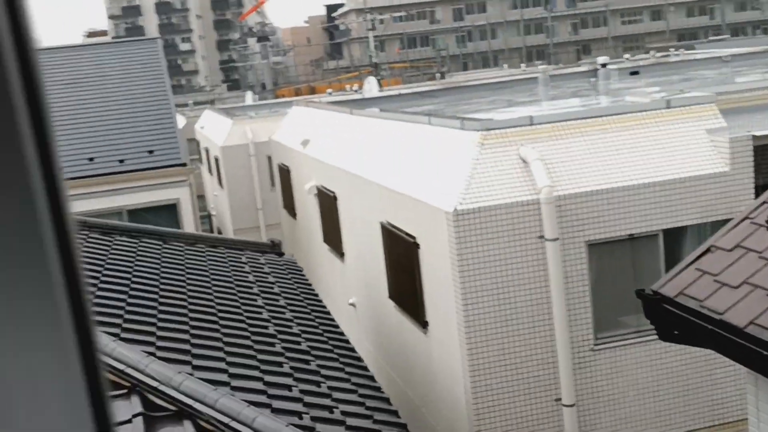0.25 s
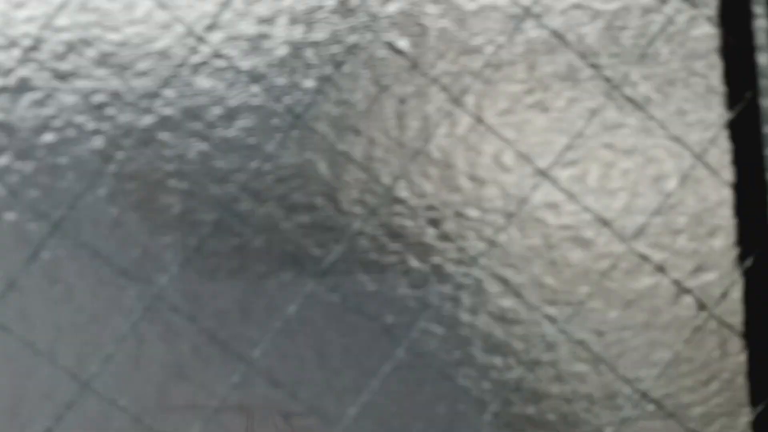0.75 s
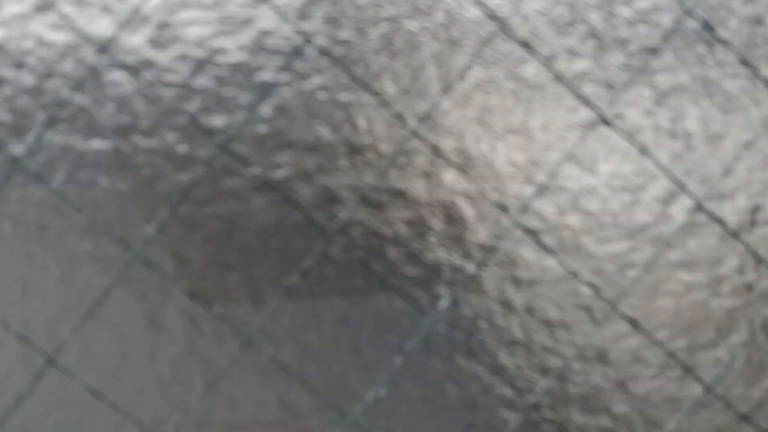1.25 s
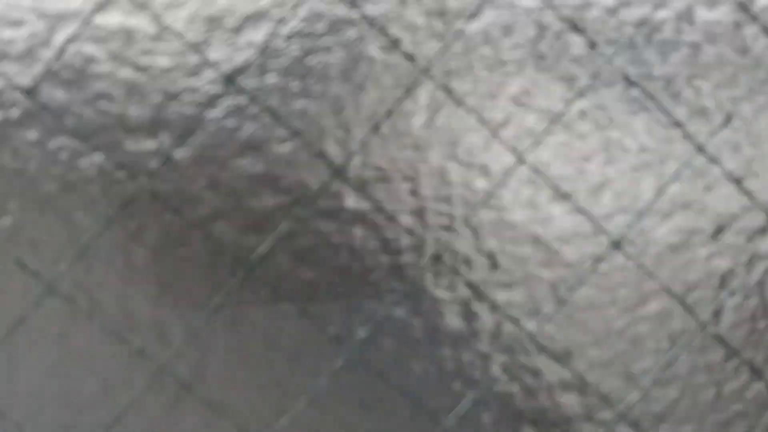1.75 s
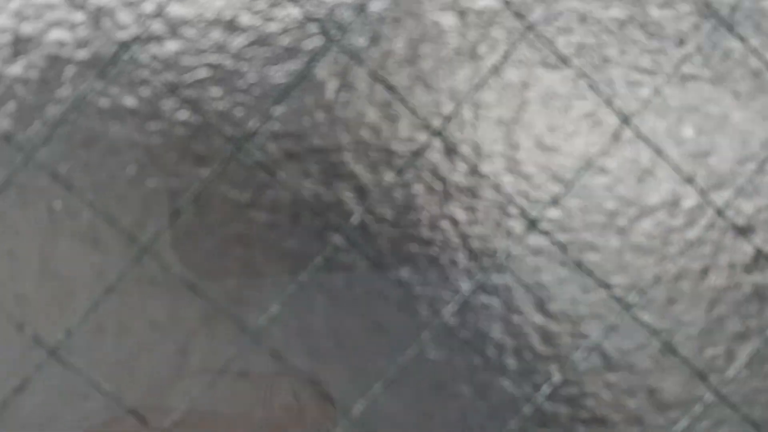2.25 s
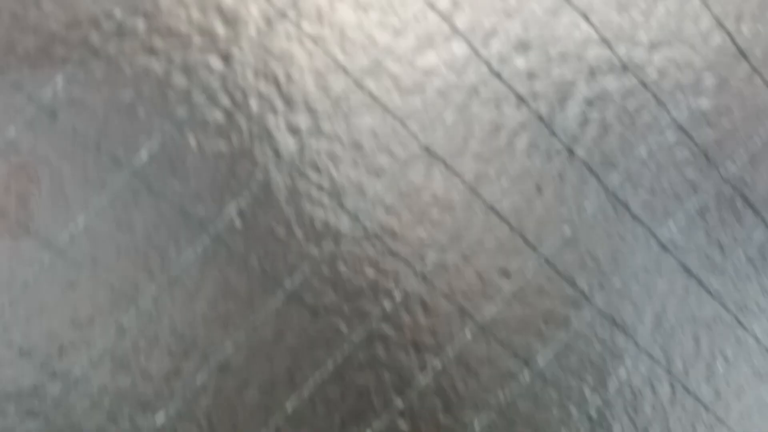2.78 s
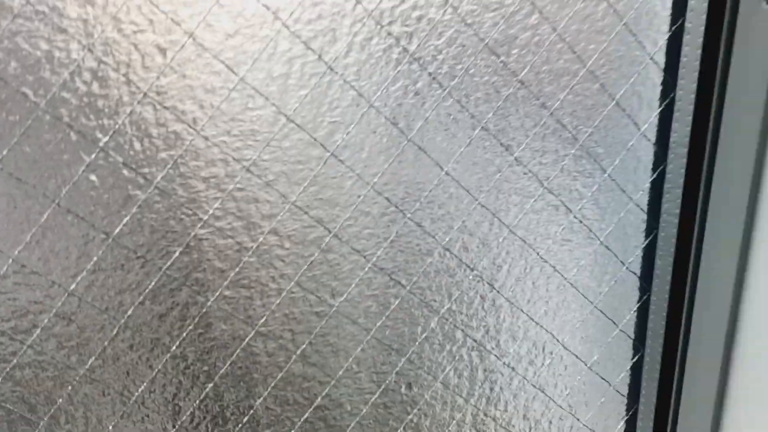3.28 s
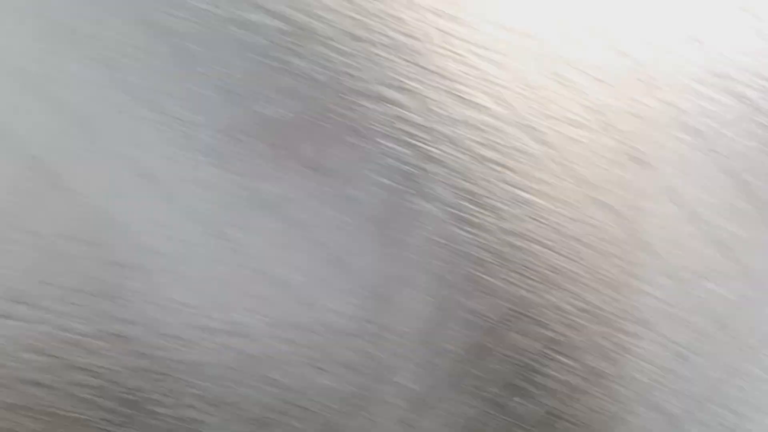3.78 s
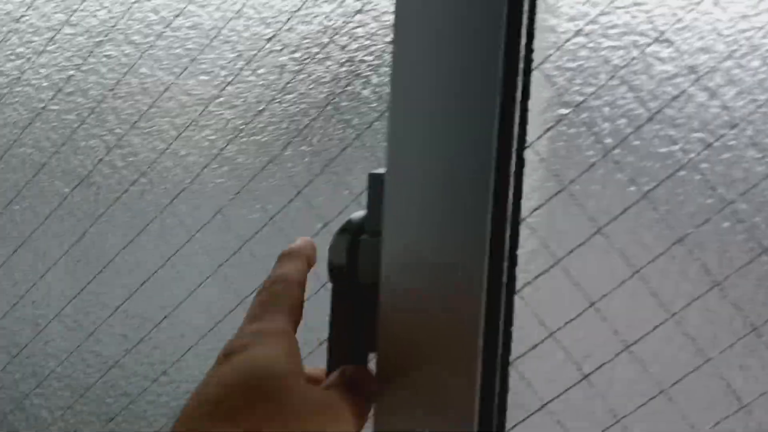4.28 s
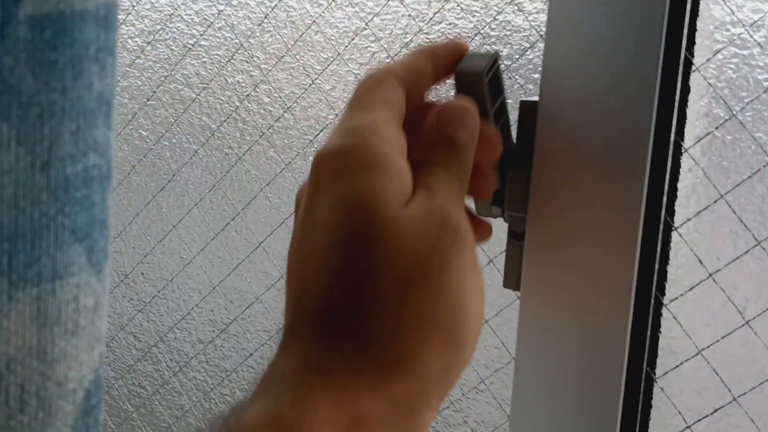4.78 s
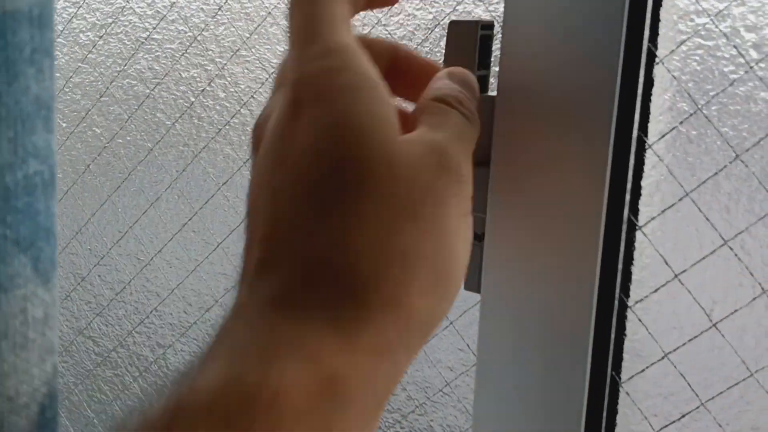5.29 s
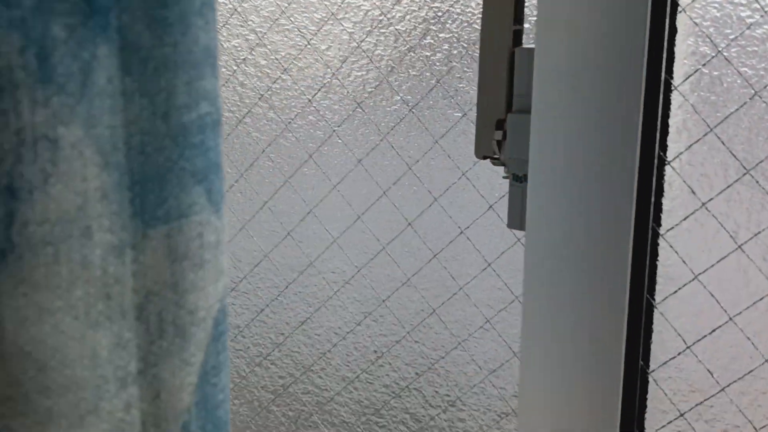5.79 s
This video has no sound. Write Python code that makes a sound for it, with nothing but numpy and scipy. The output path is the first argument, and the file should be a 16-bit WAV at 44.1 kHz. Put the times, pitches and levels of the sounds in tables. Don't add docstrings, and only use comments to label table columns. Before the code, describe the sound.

Inside a small furnished room, light rain washes in through an open window. The sash slides shut with a low rolling rumble, gritty scrape and brushing hiss, then slams hard and rattles. The rain becomes muffled. Catches tick, a hand and sleeve rustle, and a latch grinds and clicks before a faint creak. Close handheld stereo microphone.

```python
import sys
import numpy as np
from scipy import signal
from scipy.fft import rfft, irfft, next_fast_len
from scipy.io import wavfile
from scipy.ndimage import uniform_filter1d

SR = 44100
rng = np.random.default_rng(int(sys.argv[2]) if len(sys.argv) > 2 else 0)


def output_pcm(signal):
    pcm = np.clip(np.atleast_2d(signal).T, -1, 1) * 32767
    wavfile.write(sys.argv[1], SR, np.round(pcm).astype(np.int16))


N = 266275
LONG = next_fast_len(N)
BINS_HZ = np.arange(LONG // 2 + 1) * SR / LONG + 1

# frequency in Hz, width in Hz, level in dB.
FRAME_MODES = [(890, 204, -3), (1041, 110, -1), (1299, 105, 1.5), (1503, 154, 1.5), (1943, 200, -2.5),
               (2380, 376, -0.5), (2754, 270, -5.5)]
# frequency in Hz, level in dB per Hz.
SEAL_COLOUR = [(180, -9), (300, 3), (366, -21), (478, -14.5), (787, -22.5), (1040, -1), (1510, 1),
               (1750, -1), (2880, -7.5), (3830, -16), (8220, -17.5), (9880, -10), (16000, -37.5)]


def undb(db):
    return 10 ** (np.asarray(db) / 20)


def unit(x):
    return x / np.sqrt(np.mean(x ** 2))


def power_sum(*gains):
    return np.sqrt(sum(g ** 2 for g in gains))


def on_log(table, hz):
    f, v = np.transpose(table)
    return np.interp(np.log(hz), np.log(f), v)


def colour(x, table):
    n = next_fast_len(x.shape[-1])
    gain = undb(on_log(table, np.arange(n // 2 + 1) * SR / n + 1))
    return irfft(rfft(x, n) * gain, n)[..., :x.shape[-1]]


def shape(x, gain):
    return irfft(rfft(x, LONG) * gain, LONG)[..., :N]


def passband(x, lo_hz, hi_hz):
    return signal.sosfilt(signal.butter(3, [lo_hz, hi_hz], "band", fs=SR, output="sos"), x)


def resonate(x, hz, width_hz):
    return signal.lfilter(*signal.iirpeak(hz, hz / width_hz, fs=SR), x)


def glide(x, hz, width_hz):
    turn = np.exp(2j * np.pi * np.cumsum(hz * np.ones(x.shape[-1])) / SR)
    smooth = signal.lfilter(*signal.butter(2, width_hz / 2, fs=SR), x * turn.conj())
    return (smooth * turn).real / np.sqrt(width_hz)


def ring(x, hz, t60):
    p = np.exp(2j * np.pi * hz / SR - np.log(1000) / (t60 * SR))
    return signal.lfilter([0, p.imag], [1, -2 * p.real, abs(p) ** 2], x)


def walk(rate):
    k = int(SR / rate)
    steps = np.repeat(rng.standard_normal(N // k + 1), k)
    return uniform_filter1d(uniform_filter1d(steps, k), k)[:N]


def swell(s, db, rise_s, fall_s):
    t = np.arange(N) / SR - s
    return undb(db) * np.exp(np.where(t < 0, t / max(rise_s, .002), -t / max(fall_s, .002)))


def curves(table):
    s, *columns = np.transpose(table)
    t = np.arange(N) / SR
    gate = uniform_filter1d(1. * ((t >= s[0]) & (t < s[-1])), 900)
    return [np.interp(t, s, c) for c in columns], gate


def diffuse(grain_db):
    # frequency in Hz, share of the sound common to both microphones.
    likeness = [(60, 0.95), (300, 0.75), (500, 0.42), (1000, 0.27), (2500, 0.049), (5000, 0.021)]
    grains = np.repeat(np.minimum(rng.exponential(size=N // 32 + 1), 5.), 32)[:N]
    common, left, right = rng.standard_normal((3, N)) * undb(grain_db * grains)
    share = np.clip(on_log(likeness, BINS_HZ), 0, 1)
    return shape(common, np.sqrt(share)) + shape(np.array([left, right]), np.sqrt(1 - share))


def rain():
    # frequency in Hz, level in dB per Hz.
    rain_colour = [(25, -34), (60, -4), (105, 3), (150, -8.5), (210, -6.5), (315, 0.5), (450, -14.5),
                   (750, -14.5), (1050, -10.5), (2000, -14.5), (4000, -32.5), (7500, -37.5), (9900, -27.5),
                   (15500, -33.5)]
    wash, gust, out = colour(diffuse(grain_db=0.8), rain_colour), walk(1.66), 0
    for hz in 30 * 2 ** np.arange(0, 9.3, .5):
        out = out + undb(0.56 * gust + 1.4 * walk(6.9)) * resonate(wash, hz, 0.48 * hz)
    half_shut_s, shutting_s, open_db = 0.79, 0.43, 6.5
    opening = 1 / (1 + np.exp((np.arange(N) / SR - half_shut_s) / shutting_s))
    return unit(out) * undb(-58.5 + open_db * opening)


def room(x):
    t60_s, top_t60_s, room_db = 0.24, 0.11, -8.5
    t = np.arange(int(.4 * SR)) / SR
    noise = rng.standard_normal((2, len(t)))
    low = signal.lfilter(*signal.butter(1, 2500., fs=SR), noise)
    tail = low * undb(-60 * t / t60_s) + (noise - low) * undb(-60 * t / top_t60_s)
    tail = signal.lfilter(*signal.butter(2, 300., "high", fs=SR), tail * (t > .003))
    return x + undb(room_db) * signal.fftconvolve(x[None], unit(tail) / np.sqrt(len(t)))[:, :N]


def pane(push, damp=1.):
    # frequency in Hz, level in dB, 60 dB decay in seconds.
    pane_modes = [(61, -11, 0.59), (102.8, -5, 0.75), (157.6, -6, 0.38), (187.2, -4, 0.33),
                  (218.3, 1, 0.25), (307.3, -14, 0.23), (382, -17, 0.11), (455.6, -18, 0.35),
                  (511, -17.5, .2)]
    out = 0
    for k, (f, db, t60) in enumerate(pane_modes):
        out = out + (-1) ** k * undb(db + 2.8 * walk(22.03)) * ring(push, f, t60 * damp)
    return out


def rumble():
    push = diffuse(grain_db=2.5)
    return unit(unit(pane(push)) * undb(-3.5) + unit(resonate(push, 152.0, 200.0)))


def hiss(flicker_db):
    high = signal.butter(3, 4400., "high", fs=SR, output="sos")
    top = signal.sosfilt(high, colour(diffuse(grain_db=1.7), SEAL_COLOUR))
    return unit(top) * undb(flicker_db * walk(24))


def rustle():
    # peak in seconds, level in dB, rise in seconds, fall in seconds,
    # brightness in dB.
    strokes = [(2.78, -62, .12, 0.17, -6), (3.24, -67, 0.14, 0.14, 4), (3.6, -53, 0.28, 0.15, -6.5),
               (3.73, -48.5, 0.074, 0.18, 2), (3.88, -58, 0.082, 0.05, 6), (4.05, -65, 0.036, 0.046, 7),
               (4.53, -61.5, 0.19, .12, 2), (5.38, -60, 0.18, 0.21, -32), (5.85, -65, .05, 0.092, 2)]
    # peak in seconds, level in dB, fall in seconds.
    shudder = [(1.998, -21, 0.034), (2.11, -47.5, .15), (2.22, -38.5, 0.063), (2.7, -51.5, 0.78),
               (2.86, -57, 0.083), (4.05, -52.5, 0.13), (4.71, -57, .2)]
    # peak in seconds, level in dB, rise in seconds, fall in seconds.
    brushes = [(2.8, -62, .2, 0.28), (3.3, -64, 0.13, 0.18), (3.75, -53, 0.14, 0.19),
               (4.53, -58, 0.19, .15), (4.87, -63, .03, .04), (5.83, -63.5, .1, 0.11)]
    # peak in seconds, level in dB, rise in seconds, fall in seconds.
    let_go = (5.37, -57, .07, .17)
    # frequency in Hz, level in dB.
    creak_modes = [(920, 2), (1060, 2), (1520, 3), (1790, 1), (2040, 1), (2290, -15), (2850, -5)]
    # frequency in Hz, level in dB.
    cloth_bands = [(500, -12), (800, -7), (1500, -2.5), (2400, -1), (3000, -7), (3700, -15.5),
                   (4600, -17.5)]
    still_db, still_bright_db, still_hiss_db, still_pane_db = -67, -73.5, -72, -62
    shut = np.arange(N) / SR > shudder[0][0]
    shake = power_sum(*(swell(s, db, 0.0098, fall_s) for s, db, fall_s in shudder))
    rattle = undb(-23) * shake
    dull = power_sum(*(swell(*row[:4]) for row in strokes))
    sharp = power_sum(*(swell(*row[:4]) * undb(row[4]) for row in strokes))
    dull_db = 20 * np.log10(power_sum(undb(still_db), dull, rattle))
    bright_db = 20 * np.log10(power_sum(undb(still_bright_db), sharp, rattle))

    cloth, rub = diffuse(grain_db=2.0), 0
    for hz in 560 * 2 ** np.arange(0, 3.1, 1 / 3):
        bright = np.clip(np.log2(hz / 1380.0) / .8, 0, 1)
        patch = unit(resonate(resonate(cloth, hz, 0.38 * hz), hz, 0.38 * hz))
        band_db = (1 - bright) * dull_db + bright * bright_db + on_log(cloth_bands, hz)
        rub = rub + undb(band_db + 3.5 * walk(25)) * patch

    focus_db = bright_db + 1.0 * (bright_db + 45.5) + 3.6 * walk(30)
    focus = unit(glide(cloth, 3300. * (1 + 0.032 * walk(10)), 550.)) * undb(focus_db)
    singing = sum(undb(db + 4. * walk(11)) * resonate(cloth, f, 60.) for f, db in creak_modes)
    creak = unit(singing) * swell(*let_go)
    fizz = power_sum(undb(still_hiss_db), *(swell(*row) for row in brushes))
    fizz = fizz * undb(-1.0) * hiss(flicker_db=-3.5)
    low = power_sum(undb(still_pane_db), shake, undb(-30.5) * dull ** 0.59)
    return shut * (rub + focus + creak + fizz + low * undb(-2.5) * rumble())


def latch():
    # time in seconds, level in dB.
    grind = [(4.46, -48), (4.474, -73), (4.508, -53), (4.53, -54.5), (4.74, -48.5), (4.812, -61),
             (4.834, -47), (4.95, -64)]
    # frequency in Hz, width in Hz, level in dB.
    keeper_modes = [(316, 25, 7.5), (491, 36, 1), (558, 22, 3), (630, 37, -2), (770, 44, -31)]
    (grind_db,), moving = curves(grind)
    slips = diffuse(grain_db=4.5)
    seats_s, seated_tilt_db = 4.67, 9.5
    seated = np.tanh((np.arange(N) / SR - seats_s) / 0.022)
    rings = 0
    for f, w, db in keeper_modes:
        tilted_db = db - seated_tilt_db * seated * np.log2(f / 424.0)
        rings = rings + undb(tilted_db) * resonate(slips, f, w) / np.sqrt(w)
    return moving * undb(grind_db + 0.6) * unit(rings)


def knocks(table, crack_colour, contact_s, pane_db, frame, low_hz, damp):
    size = 4096
    out, push, t = np.zeros(N + size), np.zeros(N + size), np.arange(size) / SR
    contact = np.hanning(int(contact_s * SR))
    for s, peak_db, hz, blow_db, crack_db, t60 in table:
        noise, i = rng.standard_normal((2, size)), int(s * SR)
        decay = undb(-60 * t / max(t60, .004)) + 0.89 * np.exp(-t / 0.00039)
        fade = (1 - np.exp(-t / 0.00012)) * decay
        burst = noise[0] * fade
        own = resonate(resonate(burst, hz, 0.51 * hz), hz, 0.51 * hz)
        sash = sum((-1) ** k * undb(db) * resonate(burst, f, 2.75 * w) for k, (f, w, db) in enumerate(FRAME_MODES))
        body = own + frame * passband(sash, 280.0, 3300.) + 0.044 * passband(burst, 310.0, 4014.0)
        crack = fade * colour(noise[1], crack_colour)
        out[i:i + size] += undb(peak_db + 1.5) * body / abs(body).max()
        out[i:i + size] += undb(crack_db + 2.0) * crack / abs(crack).max()
        push[i:i + len(contact)] += undb(blow_db + pane_db) * contact / contact.sum()
    return out[:N] + signal.lfilter(*signal.butter(2, low_hz, "high", fs=SR), pane(push[:N], damp))


def hard_knocks():
    # start in seconds, peak in dB, ring in Hz, blow on the pane in dB, crack in
    # dB.
    rail_ticks = [(0.11, -49, 1040, -42.5, -42), (0.171, -33, 1510, -47, -33),
                  (0.172, -37.5, 3700, -63, -45), (1.704, -31, 1040, -35, -56),
                  (1.892, -33.5, 1320, -47, -51), (1.964, -31, 1300, -55, -56),
                  (1.997, -17.5, 1310, -40.5, -35), (2.035, -33, 1390, -45, -50)]
    catch_ticks = [(2.593, -47, 2600, -51.5, -48), (2.628, -43, 2000, -36.5, -54),
                   (2.65, -26, 2250, -43.5, -9.5), (2.651, -30.5, 1300, -51, -40),
                   (2.675, -41.5, 1210, -34, -56), (2.815, -44, 1050, -65, -75),
                   (2.858, -38, 1710, -54, -76), (2.896, -39.5, 1000, -61, -67)]
    finger_taps = [(3.137, -50, 1360, -75, -61), (3.25, -40.5, 1640, -55, -37),
                   (3.510, -40, 2770, -65, -66), (3.594, -40, 2600, -71, -64), (3.756, -28, 2900, -62, -59),
                   (4.004, -29.5, 3000, -45.5, -46), (4.035, -43, 3100, -78, -68),
                   (4.07, -46.5, 3200, -64.5, -67.5), (5.840, -44, 1860, -58, -63),
                   (5.865, -44, 1060, -75, -65)]
    lever_clicks = [(4.324, -46, 610, -52, -58), (4.367, -53, 1760, -53, -47), (4.451, -43, 2020, -52, -40),
                    (4.496, -35, 2000, -49, -30.5), (4.504, -34.5, 584, -59, -29),
                    (4.604, -41.5, 590, -52, -47), (4.627, -40, 580, -53, -52), (4.65, -58, 590, -57, -43),
                    (4.697, -39, 616, -38.5, -63), (4.75, -39, 1390, -39, -48.5),
                    (4.828, -30, 620, -32.5, -49), (4.830, -33, 1340, -68, -57),
                    (4.838, -49, 900, -60, -67), (4.87, -42, 660, -41, -52.5), (4.929, -67, 799, -69, -53)]
    sash_jolts = [
        (0.16, -60, 900, -39, -80),
        (1.334, -40, 950, -35, -75),
        (1.4, -58, 900, -38, -80),
    ]
    slam_blows = [(1.988, -23, 890, -19, -42), (1.996, -14, 880, -15, -14), (2.0, -17.5, 760, -15, -16.5),
                  (2.011, -57, 789, -16, -52), (2.034, -42, 750, -16, -26.5), (2.054, -41, 861, -27.5, -46),
                  (2.092, -48, 800, -28.5, -60), (2.206, -33, 700, -26, -32),
                  (2.212, -29, 1200, -25.5, -43), (2.243, -42, 1090, -26.5, -58),
                  (2.268, -35.5, 1430, -30.5, -38.5)]
    # frequency in Hz, level in dB per Hz.
    tick_crack = [(3000, -33.5), (4500, -22.5), (5300, -2), (6000, 1), (6700, -3), (7700, 0.5),
                  (8500, -3.5), (9800, 8), (12000, -8.5), (15000, -10), (16500, -33.5)]
    # frequency in Hz, level in dB per Hz.
    jamb_crack = [(3000, -9), (4000, -7), (5500, -2), (7000, -1.5), (8500, -7.5), (9900, 7.5), (11500, -8),
                  (14500, -10), (16500, -23)]
    kinds = (rail_ticks, 0.032), (catch_ticks, 0.031), (finger_taps, 0.038), (lever_clicks, 0.036)
    small = [(*row, t60) for rows, t60 in kinds for row in rows]
    heavy = [(*row, 0.032) for row in sash_jolts]
    blows = [(*row, 0.03) for row in slam_blows]
    ticks = knocks(small, tick_crack, contact_s=0.00074, pane_db=-1.0, frame=0.44, low_hz=144.0, damp=0.54)
    jolts = knocks(heavy, tick_crack, contact_s=0.0078, pane_db=-3.5, frame=0.6, low_hz=30., damp=0.93)
    slam = knocks(blows, jamb_crack, contact_s=0.0019, pane_db=-4.5, frame=0.88, low_hz=35.6, damp=0.91)
    return slam + ticks + jolts


def slide():
    # time in seconds, speed in dB, seal pressure in dB.
    sash_push = [(0.0, -10, 3.5), (0.17, -8, -4), (0.36, 0.5, -3), (0.55, -2.5, 0), (1.05, 0, 1),
                 (1.32, -0.5, -4), (1.53, -7, -2), (1.78, -2.5, 0.5), (1.98, -3.5, -1.5)]
    # peak in seconds, level in dB, rise in seconds, fall in seconds.
    seal_grips = [
        (0.11, -58, 0.0082, .015),
        (1.74, -53, .04, .07),
    ]
    # frequency in Hz, width in Hz, level in dB.
    squeal_modes = [(3540, 130, -1), (4420, 250, -2), (4730, 300, 0)]
    roll_db, roll_per_speed, scrape_db, seal_db, squeal_idle_db = -47, 0.99, -48.5, -50.5, -72.5
    (speed_db, press_db), moving = curves(sash_push)
    end = 2 * SR
    t = np.arange(end) / SR
    grit = diffuse(grain_db=1.5)[:, :end]

    rings = 0
    for f, w, db in FRAME_MODES:
        wander_hz = f * (1 + 0.061 * walk(2.97)[:end])
        rings = rings + undb(db + 2.9 * walk(7.87)[:end]) * glide(grit, wander_hz, w)
    gap_hz, sag_hz_per_s, gap_opens_s, gap_db = 1558, 110, 0.69, -12.5
    gap = unit(glide(grit, gap_hz - sag_hz_per_s * (t - gap_opens_s), 104.0))
    gap = gap * np.clip((t - gap_opens_s) / 0.083 + 1, 0, 1) * (t < 1.52)
    broad = passband(colour(grit, SEAL_COLOUR), 340.0, 4300.0)
    scrape = unit(unit(rings) * undb(-6.5) + unit(broad) + undb(gap_db) * gap)
    scrape = scrape * undb(scrape_db + speed_db + 1.75 * walk(25.28))[:end]

    grip = power_sum(undb(squeal_idle_db), *(swell(*row) for row in seal_grips))
    squeal = unit(sum(glide(grit, f, w) * undb(db) for f, w, db in squeal_modes))
    squeal = squeal * (grip * undb(-5. + 2.6 * walk(20)))[:end]
    scrape = scrape + undb(2.) * grip[:end] * unit(broad[::-1])
    frame = np.pad(scrape + squeal, ((0, 0), (0, N - end)))
    seal = power_sum(undb(seal_db + speed_db + press_db), undb(-4.0) * grip)
    rollers = undb(roll_db + roll_per_speed * speed_db) * rumble()
    return moving * (rollers + frame + seal * hiss(flicker_db=0.5))


def scene():
    # frequency in Hz, left minus right in dB.
    near_lean = [(60, 0.5), (250, 0.5), (1000, 0), (2000, 0), (4000, 1.5), (10000, 1.5)]
    left, right = room(hard_knocks())
    lean = undb(on_log(near_lean, BINS_HZ) / 2)
    close = np.array([shape(left, lean), shape(right, 1 / lean)])
    return rain() + rustle() + latch() + close + slide()


def band_limit(x):
    return signal.sosfilt(signal.butter(12, 16810, fs=SR, output="sos"), x)


def record(dry):
    # frequency in Hz, left minus right in dB.
    port_balance = [(40, 14), (300, 11), (700, 11.5), (1300, 11.5), (2400, 10.5), (4400, 4.5), (7500, 3),
                    (9900, -7.5), (12000, -7), (15000, -10.5)]
    # frequency in Hz, level in dB.
    top_cut = [(15600, 0), (16000, -6), (16500, -40)]
    port_lag_s, mic_low_hz = 0.001129, 29.2
    left_share = 1 / (1 + undb(-2 * on_log(port_balance, BINS_HZ)))
    gains = 2 * np.sqrt([left_share, 1 - left_share])
    ports = shape(dry, gains * undb(on_log(top_cut, BINS_HZ)))
    ports = signal.lfilter(*signal.butter(2, mic_low_hz, "high", fs=SR), ports)
    ports[0] = np.roll(ports[0], int(port_lag_s * SR))
    mix = shape(np.clip(ports, -1, 1), BINS_HZ < 16800.)
    return band_limit(mix)


dry = scene()
out = record(dry)
output_pcm(out)
```